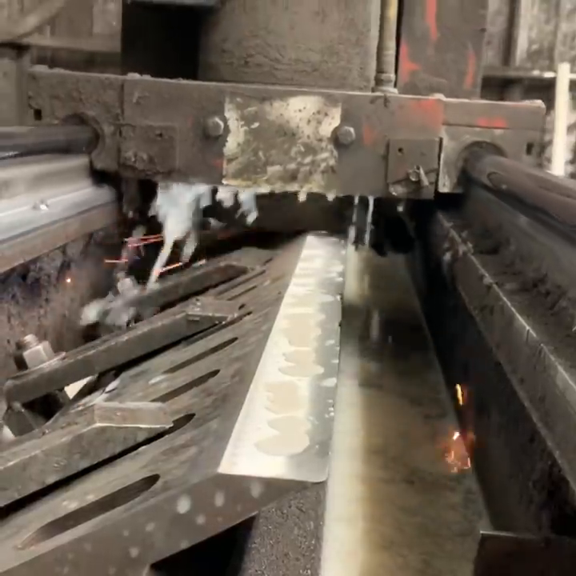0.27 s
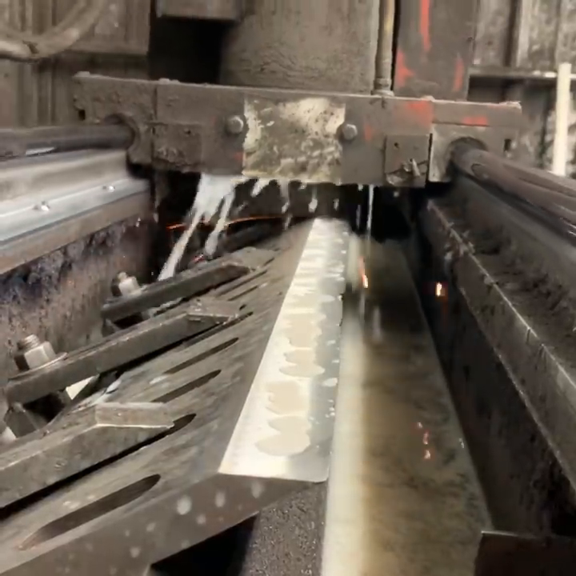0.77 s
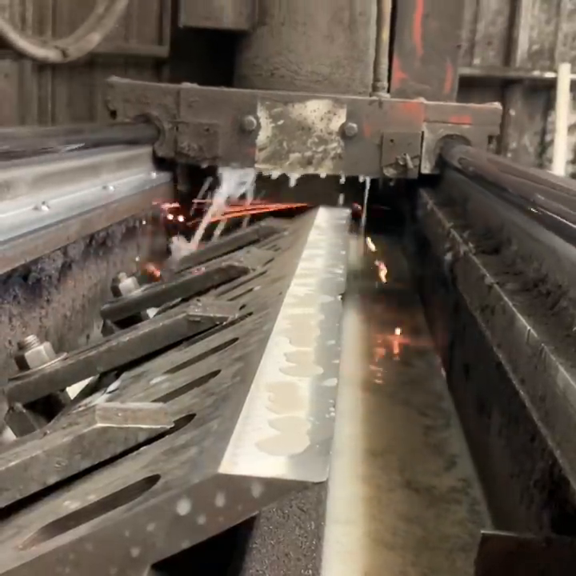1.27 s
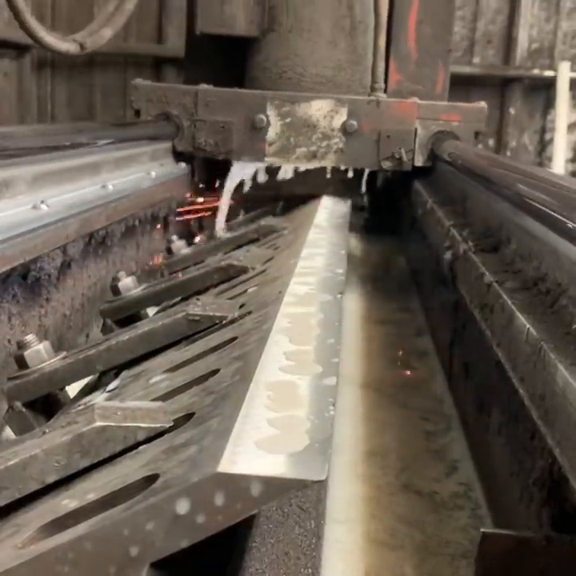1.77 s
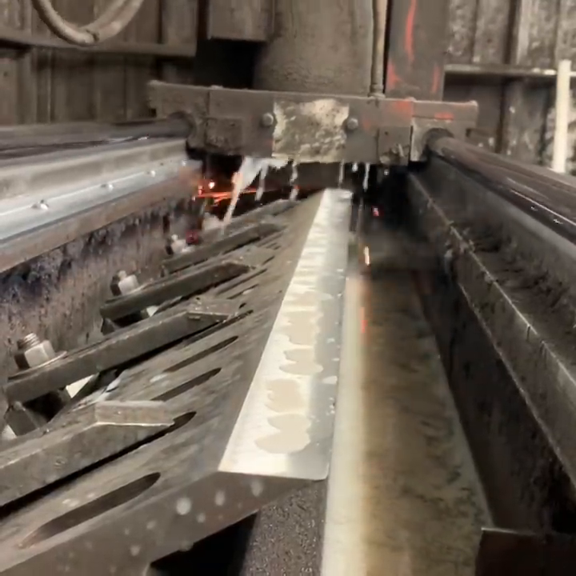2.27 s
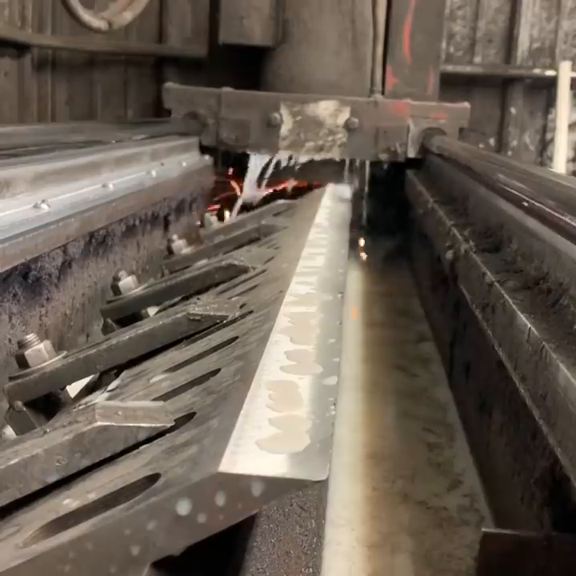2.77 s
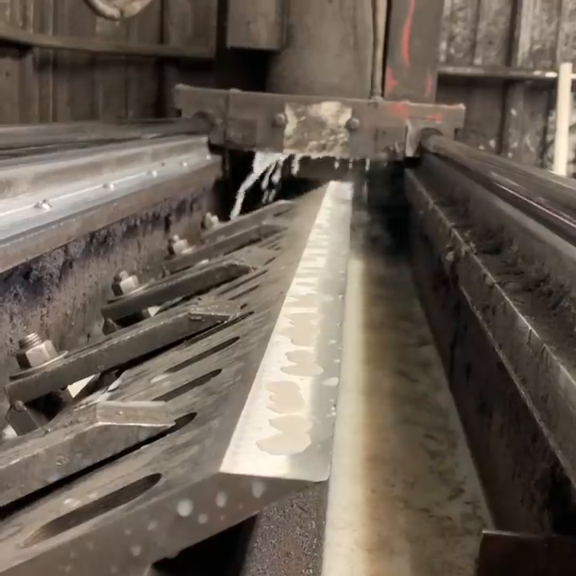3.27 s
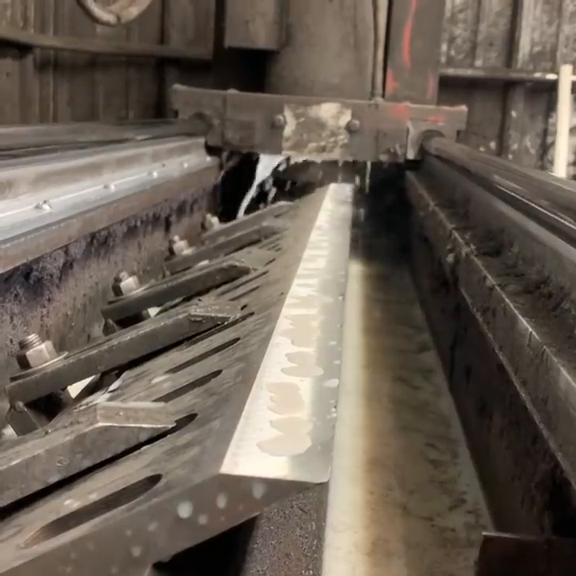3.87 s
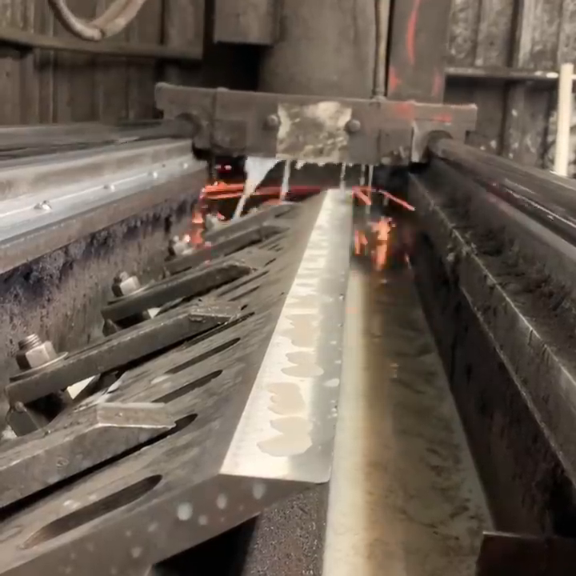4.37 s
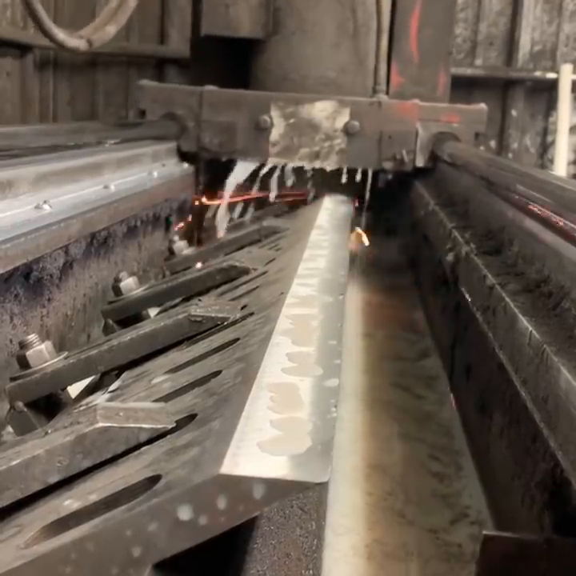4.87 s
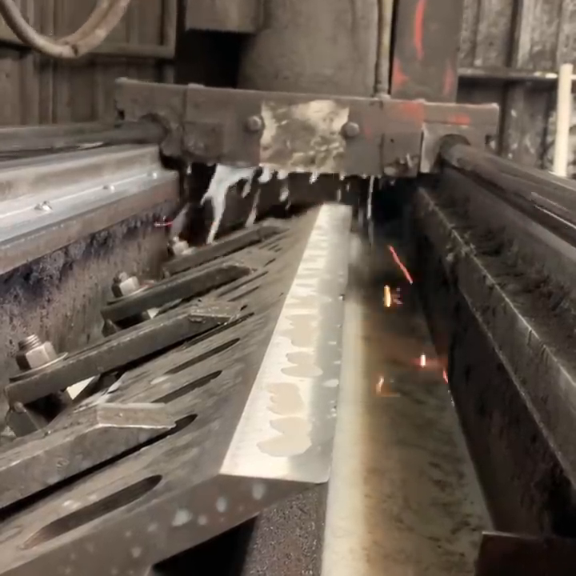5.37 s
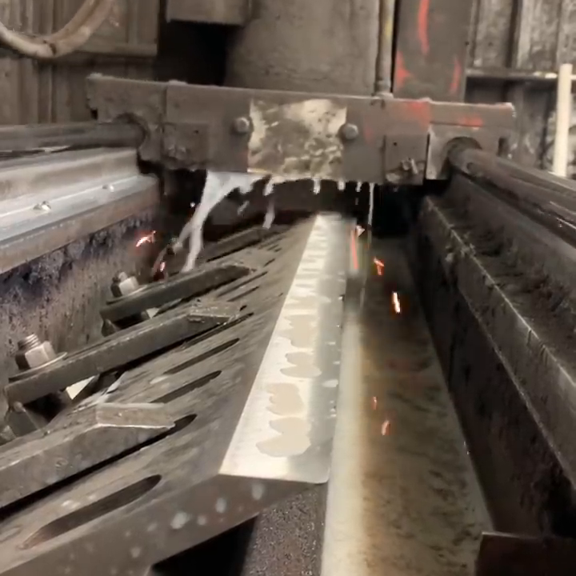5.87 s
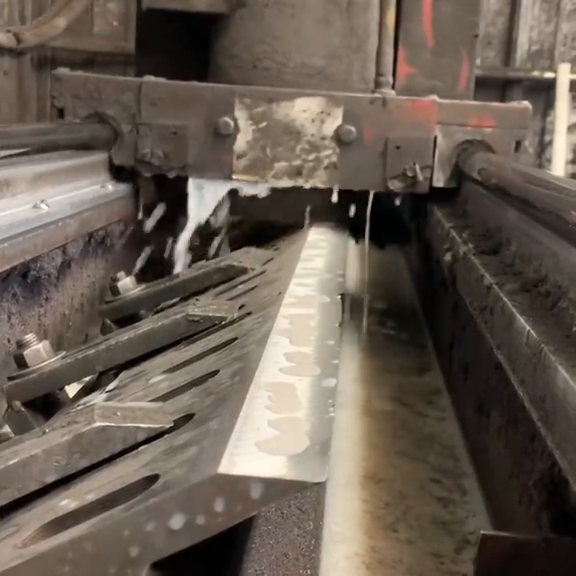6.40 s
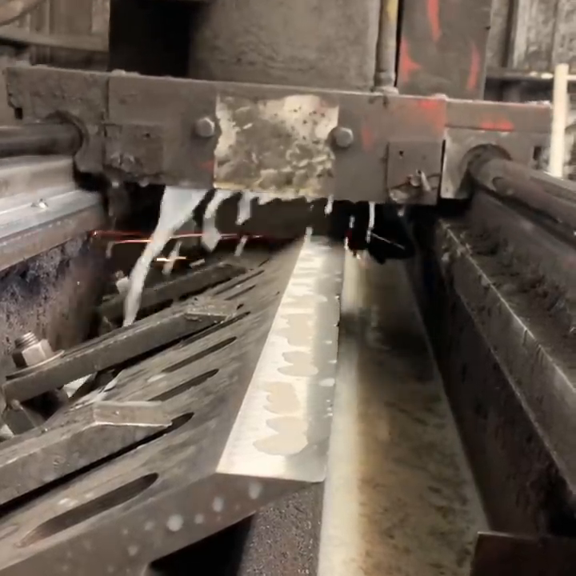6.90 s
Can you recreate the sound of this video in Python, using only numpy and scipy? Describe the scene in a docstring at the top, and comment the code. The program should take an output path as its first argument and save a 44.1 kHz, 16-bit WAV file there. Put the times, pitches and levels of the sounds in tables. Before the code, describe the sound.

A grinding machine runs close by in a workshop, its loud motor hum and low rumble continuing throughout. Over this, a wheel grinds a steel blade with a gritty hiss, a thin high ring and faint coolant spatter. A metal knock comes right at the start, and a short, stuttering rasp with a squeal at about 0.8 seconds. The hiss slowly recedes, then drops at about 2.9 seconds as the wheel leaves the steel. At 3.2 seconds the carriage reverses with a sharp clank, followed by lighter knocks. At 3.9 seconds the wheel bites again and grinds back, louder and nearer, with faint wavering squeals and a heavier rumble that swells around 5.5 and 6.3 seconds, the second time with a dull knock. Tiny high pings occur near 4.8, 6 and 7 seconds, with another short rasp at about 6.7 seconds.

```python
"""Knife grinder in a workshop

A coolant-flooded wheel travels along a steel blade: grit hisses, the blade rings and squeals,
the motor hums and the machine bed shakes. The wheel runs off the far end, the carriage reverses
with a clank, and the wheel cuts its way back towards two closely spaced microphone ports."""
import sys
import numpy as np
from scipy import signal
from scipy.fft import rfft, irfft
from scipy.io import wavfile
from scipy.ndimage import uniform_filter1d

SR = 44100
rng = np.random.default_rng(int(sys.argv[2]) if len(sys.argv) > 2 else 0)


def store_wav(level_fs):
    """Save 16-bit WAV to argv[1]."""
    pcm = np.round(np.clip(np.atleast_2d(level_fs), -1, 1) * 32767)
    wavfile.write(sys.argv[1], SR, pcm.T.astype(np.int16))


N = 314874
TIME = np.arange(N) / SR
FREQS = np.fft.rfftfreq(N, 1 / SR)
HUM_HZ, TURN_HZ = 120, 29.21


# Hiss spectrum. Each row: frequency in Hz, relative level in dB.
GRIT_SPECTRUM = [(400, -20), (800, -4), (1300, -2), (1700, -5), (2100, -1), (2500, -3), (3300, .5),
                 (4400, .8), (5500, 1), (6800, 0), (7400, -2.5), (8300, -1.2), (9000, -2.5), (9700, -4.8),
                 (11000, -5), (13200, -7.7), (14400, -7.3), (16000, -15)]
# Blade and clamp resonances. Each row: centre in Hz, width in Hz, gain in dB.
GRIT_RESONANCES = [(2050, 380, 4), (2520, 200, -2), (3300, 400, 2.2), (4000, 450, 2), (5400, 500, 2.2),
                   (7750, 400, 3), (10250, 600, 5.7)]

def grit(distance_m, heading, level_db=-31, doubling_loss_db=7, return_boost_db=3):
    """Abrasive grains tear at the steel; the pressure throbs with the wheel's turn and the hum."""
    spectrum = undb(across(GRIT_SPECTRUM) + peaks_db(GRIT_RESONANCES)) * each_turn(repeat=0.085)
    hiss = colour(grains(per_s=14000, spread_db=2.0), spectrum)
    hiss = shifting_resonances(hiss, depth_db=2.8)
    throb_db = 0.56 * np.sin(2 * np.pi * TURN_HZ * TIME) + 0.68 * np.sin(2 * np.pi * HUM_HZ * TIME)
    flicker_db = 1.06 * walk(45)
    travel_db = return_boost_db * heading - doubling_loss_db * np.log2(distance_m)
    return hiss * undb(level_db + travel_db + throb_db + flicker_db)


def shifting_resonances(x, depth_db):
    """Narrow bands swell and fade at random, as when the contact point moves along the steel."""
    cells = signal.stft(x, nperseg=1024)[2]
    field = rng.standard_normal(cells.shape)
    for _ in range(2):
        field = uniform_filter1d(field, size=3, axis=0)
        field = uniform_filter1d(field, size=19, axis=1)
    cells = cells * undb(depth_db * unit(field))
    return unit(signal.istft(cells)[1][:N])


# Ring pitch along the blade. Each row: distance in metres, frequency in Hz.
BLADE_RING_PITCH = [(.85, 6620), (1, 6750), (1.12, 6437), (1.9, 6380)]
# Ring strength. Each row: time in seconds, relative level in dB.
BLADE_RING_LEVEL = [(0, -36.5), (.3, -43), (.5, -42), (1.4, -43), (1.8, -42.5), (2.4, -41.5), (2.9, -44.5),
                    (3.95, -43.5), (4.4, -36.5), (5.1, -39), (5.4, -38.5), (5.9, -37.5), (6.35, -38.5),
                    (6.48, -44), (6.75, -35), (7.14, -44)]

def blade(distance_m, flare_db=1.0, flicker_db=1.0):
    """The clamped blade rings brightly under the wheel, flaring and flickering."""
    hz = np.interp(distance_m, *np.transpose(BLADE_RING_PITCH))
    band = ring(hz + 90 * walk(9), width_hz=700)
    db, = curves(BLADE_RING_LEVEL)
    return band * undb(db + flare_db * walk(14) + flicker_db * walk(110))


# Blade squeals and rings, plus two low swells of the machine bed. Each row: start in seconds,
# length in seconds, frequency in Hz, nominal width in Hz, relative level in dB.
SQUEALS_AND_SWELLS = [(0.04, 0.044, 976, 140, -28.5), (0.064, 0.061, 1592, 700, -33),
                      (0.608, 0.1, 1123, 160, -37), (0.82, 0.04, 2800, 77, -25.5),
                      (0.856, 0.058, 2810, 68, -25.5), (0.912, 0.075, 2810, 60, -33),
                      (0.822, 0.07, 1133, 180, -34), (0.835, 0.11, 6600, 100, -36),
                      (0.876, 0.075, 5590, 55, -26.5), (0.878, 0.029, 798, 316, -29),
                      (0.92, 0.17, 900, 80, -39), (0.951, 0.1, 3030, 310, -36.5),
                      (1.15, 1.2, 3270, 116, -47.5), (2.394, 0.34, 912, 60, -34.5),
                      (2.76, 0.24, 1047, 62, -33), (2.849, 0.1, 3060, 310, -34),
                      (2.89, .05, 1680, 500, -31.5), (2.89, 0.045, 2130, 250, -37),
                      (3.89, 0.092, 1035, 170, -29), (3.894, 0.073, 2110, 440, -35),
                      (3.902, 0.13, 3100, 300, -38), (4.099, 0.32, 934, 59, -34),
                      (4.15, 1.1, 3300, 280, -44.5), (4.54, 0.23, 1053, 34, -33),
                      (4.552, 0.58, 1118, 20, -40), (4.635, 0.38, 976, 36, -35.5),
                      (4.551, 0.74, 1083, 21, -38.5), (5.281, 0.11, 3530, 450, -31),
                      (5.361, 0.33, 336.4, 53, -24.5), (5.62, 0.4, 1072, 76, -37),
                      (5.679, 0.54, 3080, 33, -37), (6.154, 0.26, 319.7, 50, -22),
                      (6.379, 0.81, 1107, 9.3, -36.5), (6.63, 0.36, 1225, 66, -38),
                      (6.64, 0.1, 6780, 420, -34.5), (6.665, 0.14, 1110, 22, -32),
                      (6.84, 0.23, 965, 26, -42)]

def squeals_and_swells(rough_db=1.8, rough_per_s=70):
    """Stick and slip sets the blade singing roughly, renewed each turn; twice the bed's rumble swells."""
    out = np.zeros(N)
    for start_s, length_s, hz, width_hz, db in SQUEALS_AND_SWELLS:
        active = np.flatnonzero((TIME > start_s) & (TIME < start_s + length_s))
        arch = np.sin(np.pi * (TIME[active] - start_s) / length_s)
        mode = ring(np.full(len(active), hz), 1.4 * width_hz)
        limited = mode / (np.abs(signal.hilbert(mode)) + 1e-9) ** .7  # friction limits the swing
        roughness = undb(rough_db * walk(rough_per_s, size=len(active)))
        out[active] += undb(db) * arch * unit(limited * roughness)
    return irfft(rfft(out) * each_turn(repeat=.25), N)


# Harder cuts. Each row: start in seconds, length in seconds, level in dB.
BITE_EVENTS = [(0.044, 0.083, -37), (0.817, 0.032, -22), (0.856, 0.033, -24.5), (0.882, 0.034, -23.5),
               (0.909, 0.051, -30), (0.97, .08, -42), (1.2, 0.033, -31), (1.238, 0.29, -38.5),
               (2.893, 0.04, -35), (3.901, 0.081, -33.5), (3.977, 0.22, -38.5), (5.284, 0.11, -32.5),
               (6.646, 0.025, -23.5), (6.666, 0.047, -28), (6.704, 0.071, -35)]
# Rasp spectrum. Each row: frequency in Hz, relative level in dB.
RASP_SPECTRUM = [(800, -6), (1400, -4), (2200, -4), (2900, 0), (4000, -1), (5000, -3), (6500, -8),
                 (9000, -16), (15000, -25)]

def bites():
    """The wheel bites harder at high spots and rasps."""
    spectrum = undb(across(RASP_SPECTRUM)) * low_cut(700)
    rasp = colour(grains(per_s=9000, spread_db=0.5), spectrum)
    return rasp * sum(undb(db) * gate(start_s, length_s) for start_s, length_s, db in BITE_EVENTS)


# Snagging grains. Each row: start in seconds, frequency in Hz, relative level in dB.
PING_EVENTS = [(4.774, 6300, -23), (4.778, 6300, -25), (4.843, 6290, -21), (5.985, 6430, -16),
               (6.654, 6810, -21), (6.760, 6810, -18), (6.995, 6550, -19)]

def pings(rise_s=.0012, t60_s=0.022):
    """A coarse grain snags on the edge and leaves a very short ring."""
    out = np.zeros(N)
    age = TIME[:SR // 10]
    envelope = (1 - np.exp(-age / rise_s)) * decay(age, t60_s)
    for start_s, hz, db in PING_EVENTS:
        start = int(start_s * SR)
        ping = undb(db) * envelope * np.sin(2 * np.pi * hz * age)
        out[start:start + len(age)] += ping[:N - start]
    return out


# Carriage and reversing gear blows. Each row: start in seconds, relative level in dB,
# tilt in dB per octave.
KNOCK_EVENTS = [(.058, -35, 3), (.121, -20.5, -2.5), (2.062, -36, 5.5), (3.198, -21.5, 4), (3.203, -9.5, 0),
                (3.213, -28, 8), (3.396, -30, -2.5), (3.411, -25, -7), (3.659, -43, -3), (3.823, -45, 6),
                (3.880, -27, -4), (6.341, -22, -7)]
# Crash spectrum. Each row: frequency in Hz, relative level in dB.
CRASH_SPECTRUM = [(500, -.5), (800, -1.5), (1100, -5), (1700, -8), (2200, -7), (3000, -5.5), (3600, -4),
                  (5500, -8.5), (7000, -12), (8200, -11), (9500, -15.5), (10500, -15), (11200, -8.5),
                  (12200, -15), (14000, -18.5), (16000, -30)]
# Carriage modes. Each row: frequency in Hz, relative level in dB, T60 in seconds.
CARRIAGE_MODES = [(520, 5, 0.21), (645, 0, .12), (781, -2, 0.2), (1100, -1, .1), (1500, -1, .1),
                  (1930, 3, 0.11), (2194, -1, 0.11), (2649, 0, .15), (2900, -3, .13), (3460, -4, 0.13),
                  (5500, -12, 0.18), (5850, -9, .2), (6020, -10, 0.2), (6550, -10, 0.16), (7900, -12, .15),
                  (9800, -22, 0.12)]

def carriage(crack_t60_s=0.092, tail_t60_s=0.37, tail_db=-14, tail_hz=5200, modes_db=-16):
    """Steel parts slam home in quick blows, each a crash with a short bright ring."""
    out = np.zeros(N)
    age = TIME[:SR // 2]
    for start_s, db, tilt_db in KNOCK_EVENTS:
        spectrum_db = across(CRASH_SPECTRUM) + tilt_db * np.log2(np.maximum(FREQS, 500) / 500)
        crash = colour(rng.standard_normal(N), undb(spectrum_db) * low_cut(450))[:len(age)]
        crack = crash * decay(age, crack_t60_s)
        tail = signal.lfilter(*signal.iirpeak(tail_hz, Q=1, fs=SR), crash) * decay(age, tail_t60_s)
        modes = 0
        for hz, mode_db, t60_s in CARRIAGE_MODES:
            gain = undb(mode_db + tilt_db * np.log2(hz / 500))
            modes += gain * decay(age, t60_s) * np.sin(2 * np.pi * hz * age)
        start = int(start_s * SR)
        out[start:start + len(age)] += undb(db) * (crack + undb(tail_db) * tail + undb(modes_db) * modes)
    return out


# Hum swell. Each row: time in seconds, levels of harmonics 1, 2 and 3 in dB.
HUM_LEVELS = [(0.0, -23, -30, -26), (0.22, -18.5, -29.5, -33), (0.45, -22.5, -30.5, -27.5),
              (0.97, -24.5, -27.5, -33), (1.15, -18, -26.5, -32.5), (1.5, -21, -21, -25.5),
              (1.8, -22, -23, -33.5), (2.4, -18, -27, -33.5), (2.65, -17.5, -36, -32), (2.9, -16, -25, -28),
              (2.98, -21, -24.5, -45), (3.06, -15, -24, -39), (3.3, -17.5, -29.5, -32.5),
              (3.46, -14.5, -22, -24), (3.85, -14.5, -20, -29), (3.979, -13, -17.5, -30),
              (4.12, -15.5, -31, -31), (4.4, -16, -20, -30), (4.85, -19.5, -18, -29),
              (5.15, -18, -20.5, -29), (5.35, -17, -23, -31), (5.75, -17, -25, -30), (6.3, -21, -26.5, -25),
              (6.49, -20, -24, -23), (6.55, -31.5, -27, -23.5), (6.61, -20, -39, -22.5),
              (7.14, -17.5, -31, -30)]
# Flutter of harmonics 1 to 3. Each row: depth at full load as a fraction, changes per second.
HUM_LOAD_FLUTTER = [(.17, 19), (.3, 17), (0.419, 20)]
# Hum harmonic 5. Each row: time in seconds, level in dB.
WHINE_LEVEL = [(0, -33.5), (2.44, -35.5), (2.9, -36.5), (3.64, -40.5), (3.84, -61), (3.92, -30.5),
               (4.05, -37), (5.09, -29.5), (5.25, -36), (6.18, -33.5), (6.34, -33.5), (7.14, -27.5)]
# Motor and spindle tones. Each row: frequency in Hz, relative level in dB.
RUNNING_TONES = [(58.4, -48.5), (76.5, -52), (87.6, -57), (480, -37), (525.8, -34), (1225.7, -50.5),
                 (1374, -51)]
# Tones that rise with wheel contact. Each row: frequency in Hz, relative level in dB.
CUTTING_TONES = [(146, -40.5), (262.9, -30.5), (321.3, -41.5), (350.5, -37), (449, -44), (643, -54),
                 (788.5, -46.5), (817.8, -50), (909, -55), (963.6, -50), (1050.5, -55), (1076.8, -44),
                 (1105, -44.5)]

def motor(heading, contact, load, tones_db=-3.5, return_boost_db=4.0):
    """Mains hum swells and fades as the carriage travels, and flutters more under load."""
    hum = 0
    for harmonic, (db, (depth, per_s)) in enumerate(zip(curves(HUM_LEVELS), HUM_LOAD_FLUTTER), 1):
        partial = tone(harmonic * HUM_HZ, waver_rad=.14)
        flutter = 1 + depth * np.sqrt(load) * walk(per_s)
        hum += undb(db) * flutter * partial
    whine_db, = curves(WHINE_LEVEL)
    whine = undb(whine_db) * tone(5 * HUM_HZ, waver_rad=.25)
    running = sum(undb(db) * tone(hz, waver_rad=.2) for hz, db in RUNNING_TONES)
    cutting = sum(undb(db) * tone(hz, waver_rad=.25) for hz, db in CUTTING_TONES)
    spindle = running + np.sqrt(contact) * cutting
    return hum + whine + undb(tones_db + return_boost_db * heading) * spindle


# Rumble spectrum. Each row: frequency in Hz, relative level in dB.
BED_SPECTRUM = [(25, -52), (40, -49), (60, -22), (85, -14), (140, -6), (195, -11.5), (265, -6.5), (340, -5),
                (430, -7.5), (600, -10), (800, -20), (1100, -22), (1600, -31.5), (3000, -41.5)]
# Bed resonances. Each row: centre in Hz, width in Hz, gain in dB.
BED_RESONANCES = [(135, 60, 1), (180, 14, 2), (236.2, 37, 8), (292, 26, -5), (330, 14, 5), (351, 10, 5),
                  (560, 60, -3.5), (717.6, 22, 5)]

def machine_bed(load, idle_db=-30, full_load_db=-20):
    """The uneven wheel face shakes the bed, partly alike each turn and harder in a heavy cut."""
    spectrum = undb(across(BED_SPECTRUM) + peaks_db(BED_RESONANCES)) * each_turn(repeat=0.4)
    shake = colour(rng.standard_normal(N), spectrum)
    cut_gain = load * undb(full_load_db + 0.96 * walk(16))
    return shake * np.hypot(undb(idle_db), cut_gain)


# Buzz spectrum. Each row: frequency in Hz, relative level in dB.
BUZZ_SPECTRUM = [(120, -20), (200, -2), (320, 8), (470, -7.5), (580, -21), (700, -3), (860, -8), (1060, -2),
                 (1300, -11), (1500, -10), (2000, -24), (3300, -8), (4500, -44), (8000, -45)]

def wheel_buzz(heading, contact, level_db=-34, return_boost_db=3.5):
    """The same high spots strike the steel on every turn, buzzing at multiples of the turn rate."""
    buzz = colour(rng.standard_normal(N), undb(across(BUZZ_SPECTRUM)) * each_turn(repeat=.88))
    return buzz * contact * undb(level_db + return_boost_db * heading)


# Spray spectrum. Each row: frequency in Hz, relative level in dB.
SPRAY_SPECTRUM = [(200, -12), (500, 2.5), (800, -7.5), (1300, 1.5), (1750, -4.5), (2400, -9.5), (3400, -7),
                  (5500, -25.5), (7000, -12), (10000, -50), (16000, -45)]

def coolant(level_db=-37.5, splash_db=1.4):
    """Coolant flung off the wheel patters into the trough."""
    drops = colour(grains(per_s=4000, spread_db=2.5), undb(across(SPRAY_SPECTRUM)))
    return drops * undb(level_db + splash_db * walk(30))


# Arrival difference. Each row: frequency in Hz, lead of the left port in milliseconds.
LEFT_LEAD = [(400, -.03), (1200, -.01), (2000, .048), (3000, .074), (4000, .086), (4700, .106),
             (5600, .128), (6800, .147), (9000, .167), (11100, .18), (13200, .189), (16000, .197)]
# Reflection strength. Each row: frequency in Hz, level against the direct sound in dB.
REFLECTION_SPECTRUM = [(60, -27), (250, -12), (500, -6), (1000, -3.5), (2400, 0), (3500, -6.5), (6500, -9),
                       (15000, -7.5)]

def ports(x):
    """Direct sound reaches the two ports in turn; the reflections differ between them."""
    half_lead = np.exp(1j * np.pi * FREQS * across(LEFT_LEAD) / 1000)
    direct = rfft(x) * np.array([half_lead, 1 / half_lead])
    echo_gain = undb(across(REFLECTION_SPECTRUM))
    echoes = echo_gain * rfft(reflections(x))
    return irfft((direct + echoes) / np.hypot(1, echo_gain), N)


def reflections(x, t60_s=.28):
    """Echoes off bed and walls; their pattern changes every quarter second as the carriage travels."""
    hop = SR // 4
    age = TIME[:SR // 3]
    envelope = unit(decay(age, t60_s)) / np.sqrt(len(age))
    window = np.sin(np.pi * np.arange(2 * hop) / (2 * hop))
    padded = np.pad(x, (hop, 2 * hop))
    out = np.zeros((2, len(padded) + len(age)))
    for start in range(0, N + hop, hop):
        piece = window * padded[start:start + 2 * hop]
        response = envelope * rng.standard_normal((2, len(age)))
        echo = signal.fftconvolve(piece[None], response, axes=1)
        out[:, start:start + echo.shape[1]] += echo
    return out[:, hop:hop + N]


def undb(db):
    """Decibels to gain."""
    return 10 ** (np.asarray(db) / 20)


def unit(x):
    """Scale to rms 1."""
    return x / np.sqrt(np.mean(x ** 2))


def curves(table):
    """Columns of a time table, one value per sample."""
    times_s, *columns = np.transpose(table)
    return [np.interp(TIME, times_s, column) for column in columns]


def across(table):
    """A frequency table interpolated on a log axis."""
    hz, value = np.transpose(table)
    return np.interp(np.log(FREQS + 1), np.log(hz), value)


def peaks_db(table):
    """Summed gain of resonances at each frequency."""
    return sum(db / (1 + (2 * (FREQS - hz) / width_hz) ** 2) for hz, width_hz, db in table)


def low_cut(hz):
    """First-order high-pass gain."""
    return FREQS / np.hypot(FREQS, hz)


def each_turn(repeat):
    """Comb response of a pattern that partly returns with every wheel turn."""
    return 1 / (1 - repeat * np.exp(-2j * np.pi * FREQS / TURN_HZ))


def colour(x, gain):
    """Filter by a gain per frequency; rms 1."""
    return unit(irfft(rfft(x) * gain, N))


def walk(per_s, size=N):
    """Random curve of spread 1 with per_s new values a second."""
    knots = rng.standard_normal(8192)
    return np.sqrt(3 / 2) * np.interp(TIME[:size] * per_s, np.arange(len(knots)), knots)


def ring(hz, width_hz):
    """Randomly driven resonance whose centre may move."""
    phase = 2 * np.pi * np.cumsum(hz) / SR
    return walk(width_hz, len(hz)) * np.cos(phase) + walk(width_hz, len(hz)) * np.sin(phase)


def tone(hz, waver_rad):
    """Sine of rms 1 with wavering phase."""
    return np.sqrt(2) * np.sin(2 * np.pi * (hz * TIME + rng.random()) + waver_rad * walk(12))


def grains(per_s, spread_db):
    """Tiny impacts of very unequal size."""
    impacts = (rng.random(N) < per_s / SR) * rng.standard_normal(N)
    return impacts * undb(spread_db * np.minimum(rng.exponential(size=N), 5))


def gate(start_s, length_s, edge_s=0.01):
    """Gate with ramped edges."""
    attack = np.clip((TIME - start_s) / edge_s, 0, 1)
    release = np.clip((start_s + length_s - TIME) / edge_s + .5, 0, 1)
    return attack * release


def decay(age, t60_s):
    """Exponential fall of 60 dB in t60_s."""
    return np.exp(-np.log(1000) * age / t60_s)


def pan(right_db):
    """Channel gains for a source louder on the right."""
    return undb(np.array([[-right_db], [right_db]]) / 2)


# Carriage path. Each row: time in seconds, distance from the ports in metres.
CARRIAGE_PATH = [(0, 1), (2, 1.64), (3.3, 1.9), (4, 1.8), (5, 1.58), (7.14, .85)]
# Wheel on the steel. Each row: time in seconds, contact from 0 to 1.
WHEEL_CONTACT = [(0, 1), (2.925, 1), (2.945, 0.33), (3.4, 0.35), (3.89, 0.21), (3.915, 0.97), (7.14, 0.87)]
# Heaviness of the cut. Each row: time in seconds, load from 0 to 1.
WHEEL_LOAD = [(0, 0.2), (.7, 0.38), (1.15, 0.6), (1.9, 0.34), (2.88, 0.58), (2.98, 0.39), (3.86, 0),
              (3.95, 0.67), (4.6, 0.64), (5.4, 1), (6.3, 0.73), (7.14, 0.92)]

def scene(reverse_at_s=3.4, reverse_takes_s=0.06):
    """One pass out and back, heard from the end of the machine bed."""
    distance_m, = curves(CARRIAGE_PATH)
    contact, = curves(WHEEL_CONTACT)
    load, = curves(WHEEL_LOAD)
    heading = np.clip((TIME - reverse_at_s) / reverse_takes_s, -.5, .5)  # -.5 away, +.5 back
    cut = contact * (grit(distance_m, heading) + blade(distance_m))
    wheel = cut + bites() + squeals_and_swells() + pings() + coolant()
    body = ports(machine_bed(load) + wheel_buzz(heading, contact)) + motor(heading, contact, load)
    return ports(wheel + carriage()) + pan(right_db=1.0) * body


def record(dry, ceiling=.85, top_hz=15600):
    """Round the highest peaks and cut the top of the treble."""
    rounded = dry / (1 + (dry / ceiling) ** 8) ** (1 / 8)
    return signal.sosfilt(signal.ellip(10, .1, 80, top_hz, fs=SR, output="sos"), rounded)


dry = scene()
out = record(dry)
store_wav(out)
```